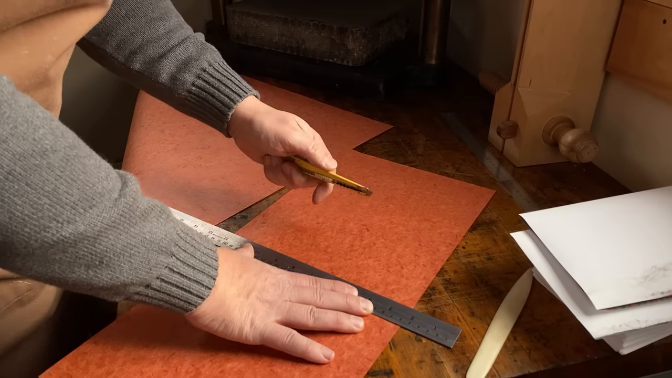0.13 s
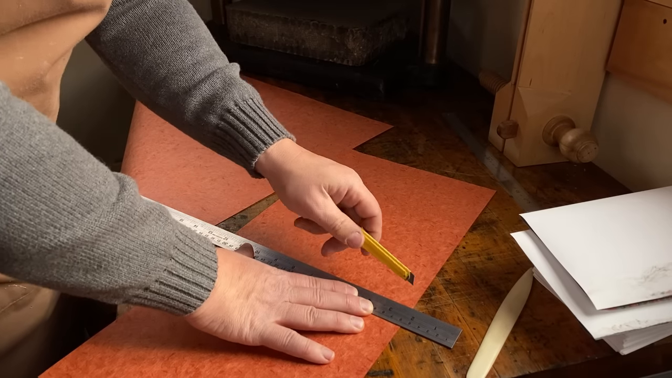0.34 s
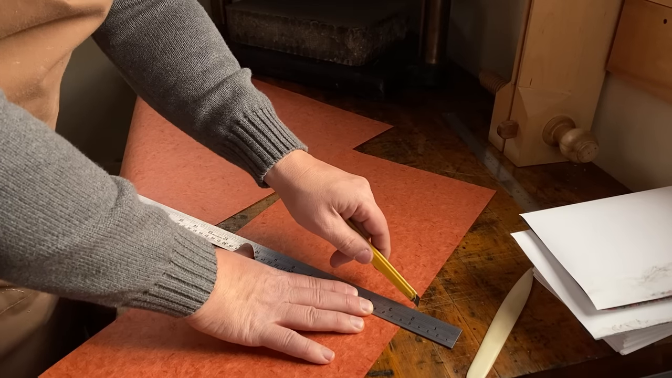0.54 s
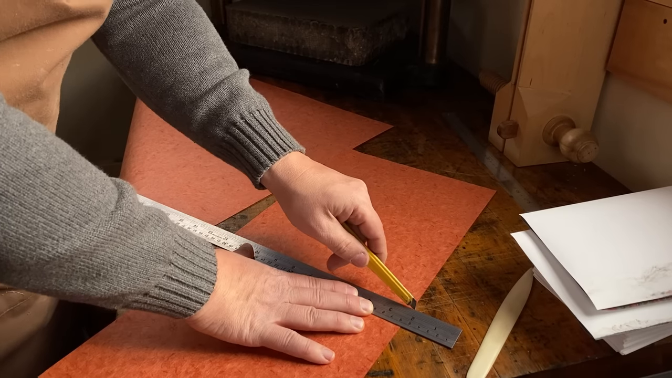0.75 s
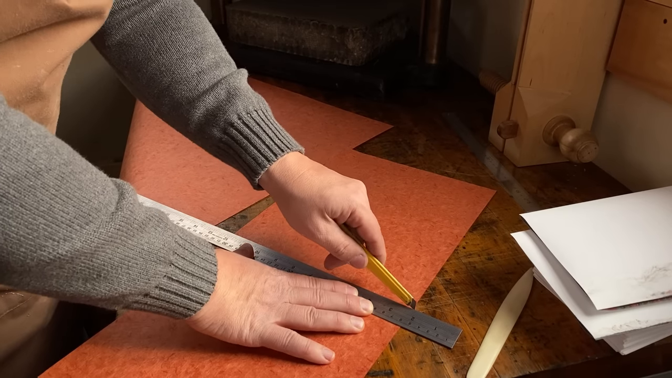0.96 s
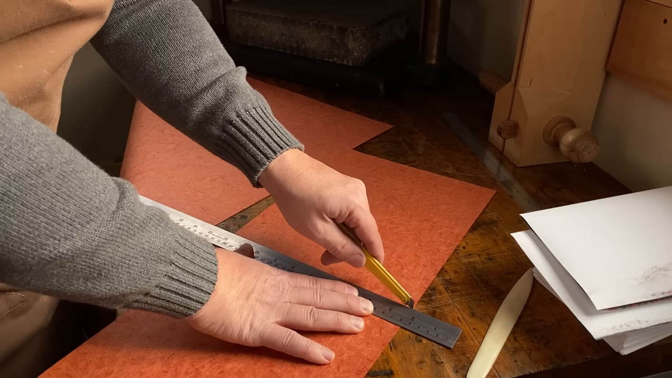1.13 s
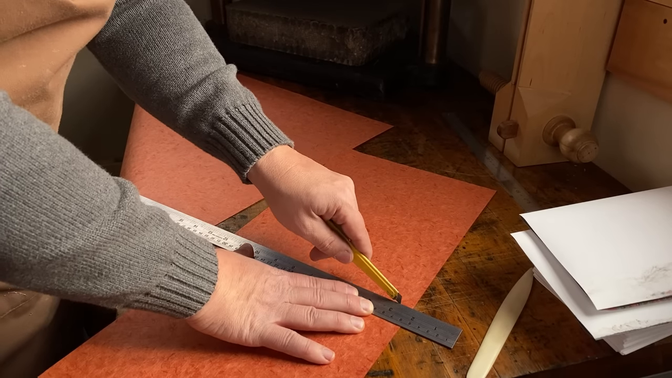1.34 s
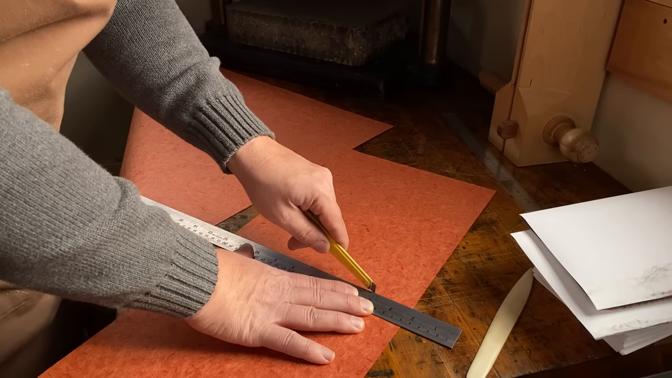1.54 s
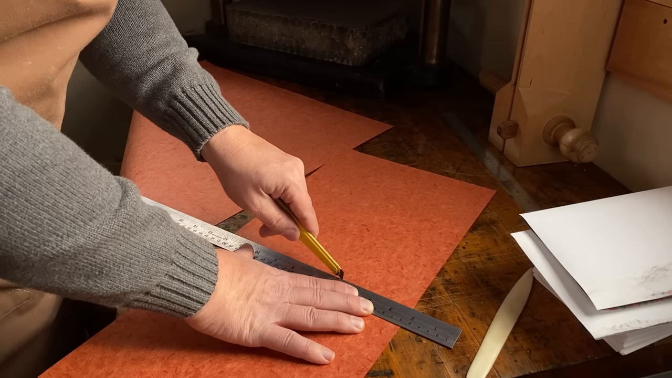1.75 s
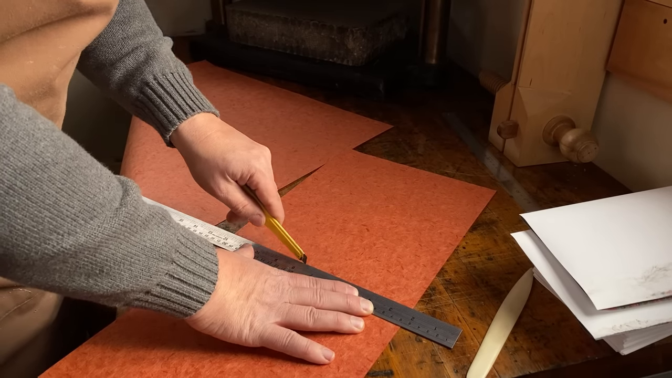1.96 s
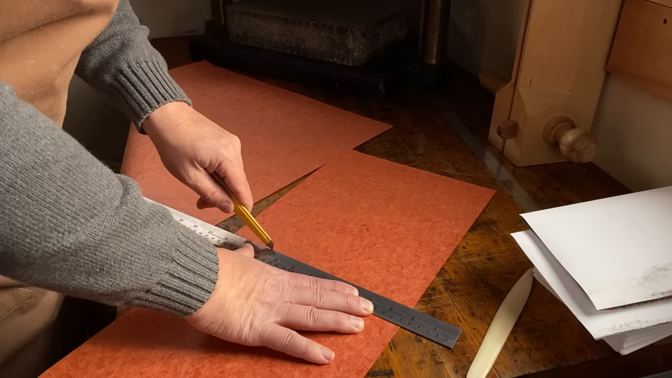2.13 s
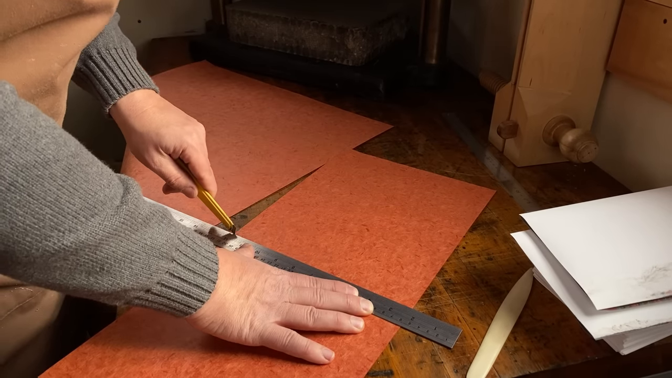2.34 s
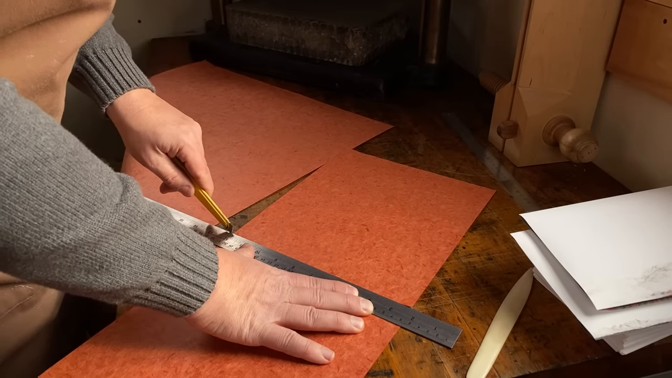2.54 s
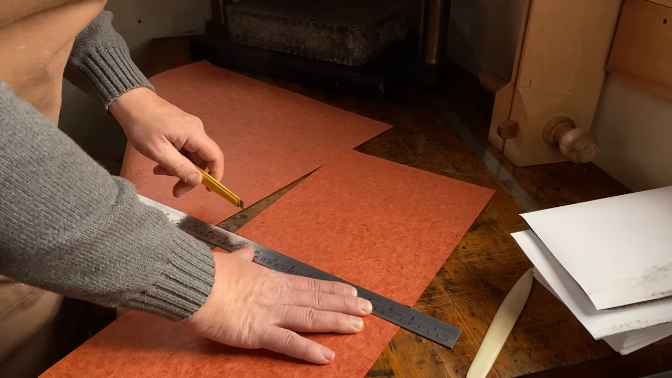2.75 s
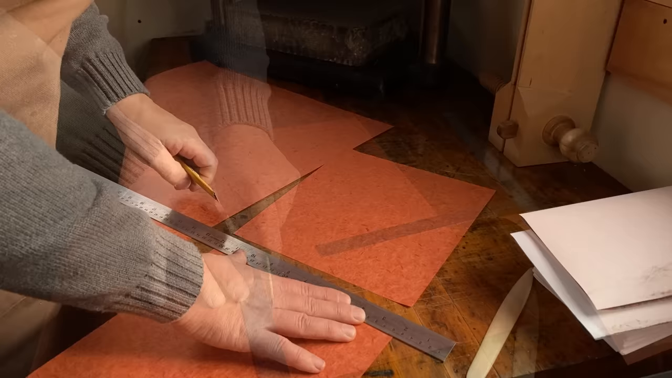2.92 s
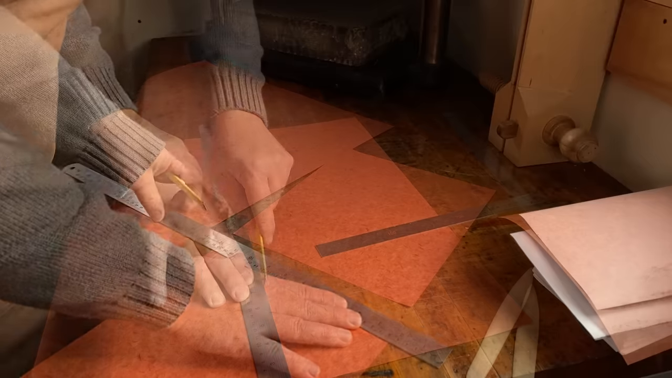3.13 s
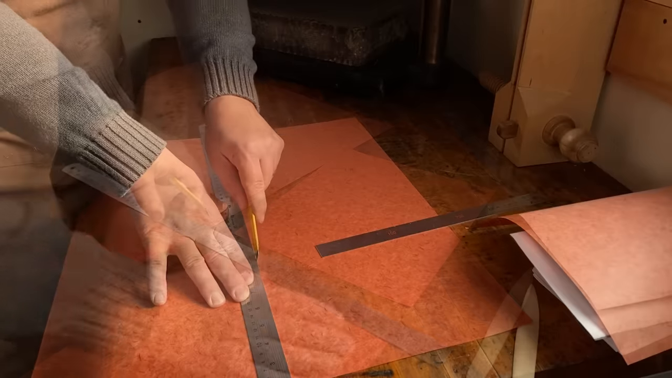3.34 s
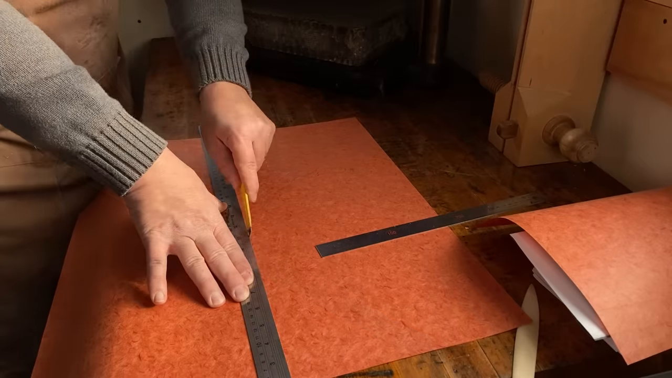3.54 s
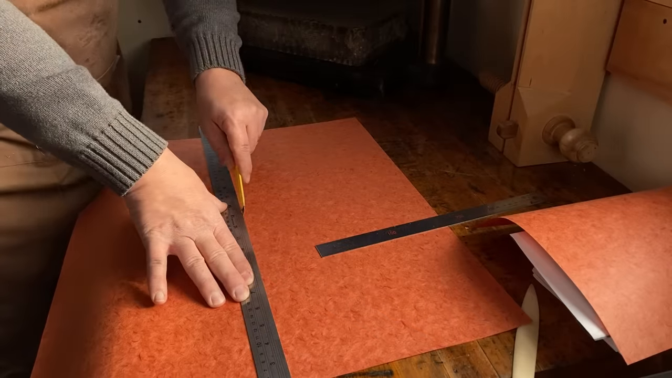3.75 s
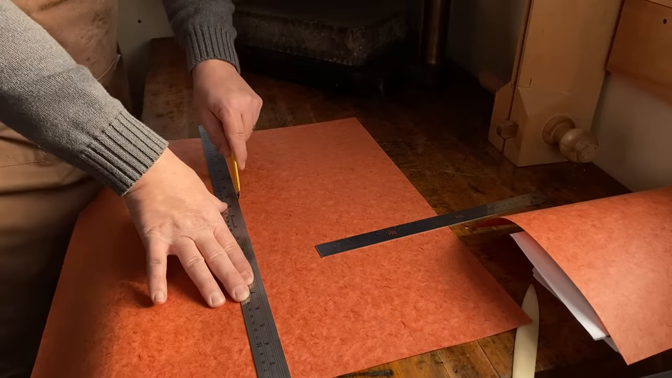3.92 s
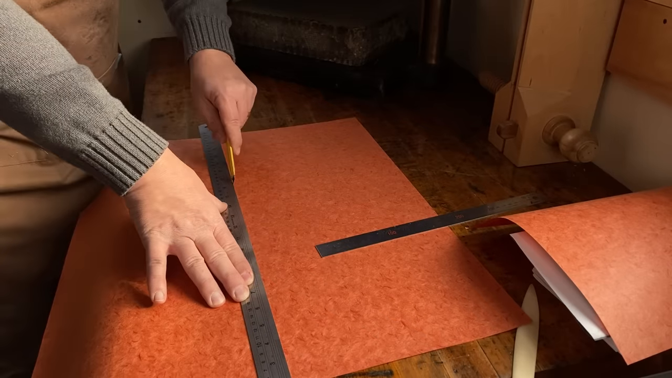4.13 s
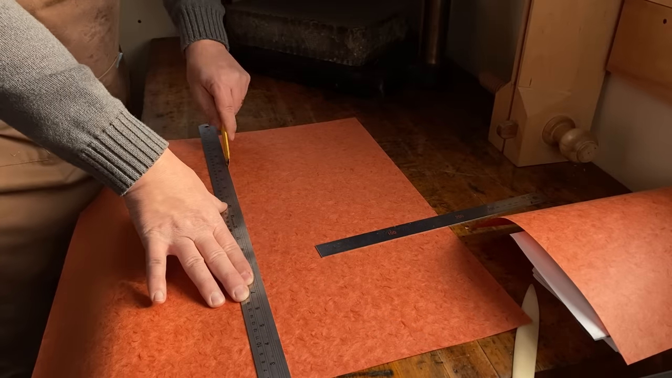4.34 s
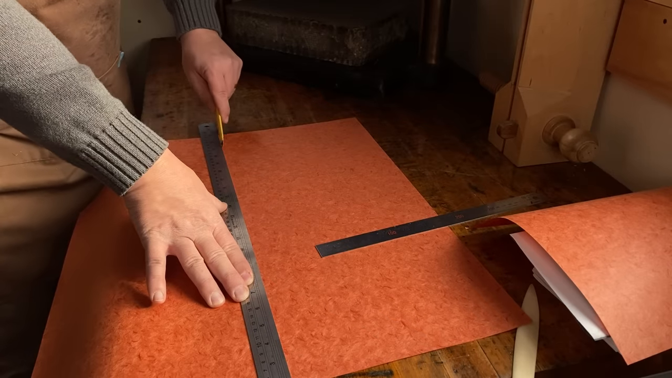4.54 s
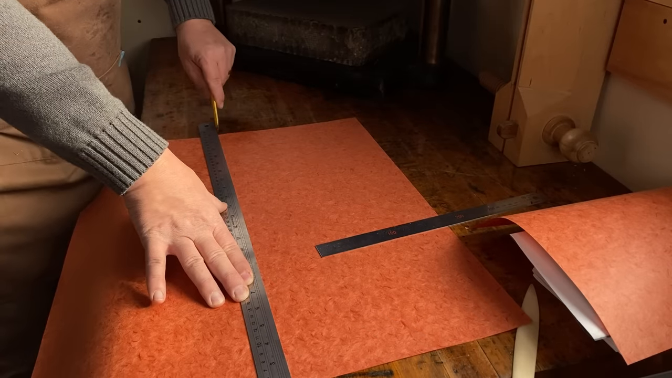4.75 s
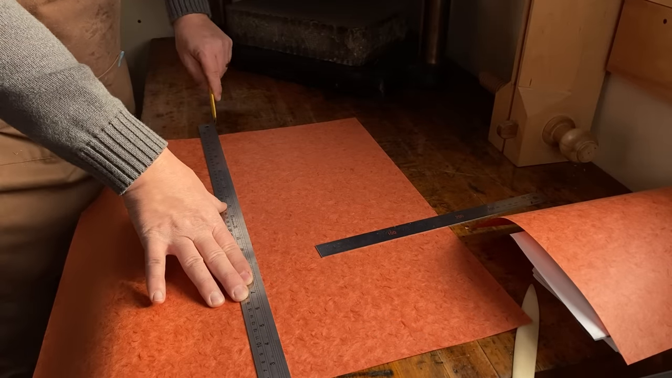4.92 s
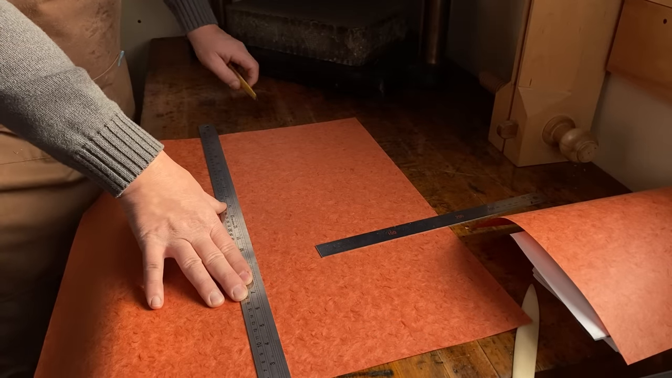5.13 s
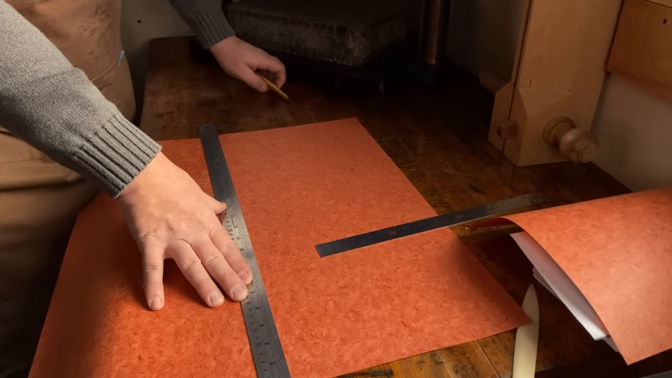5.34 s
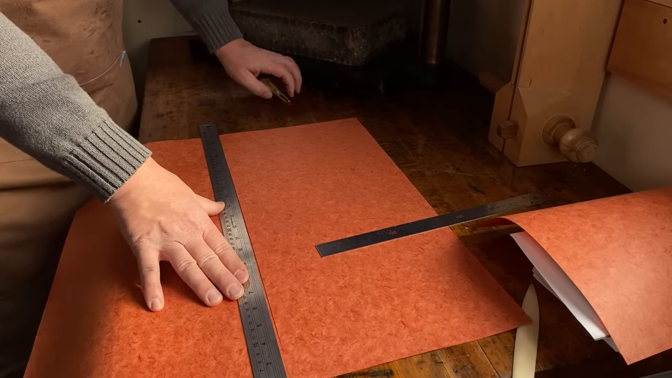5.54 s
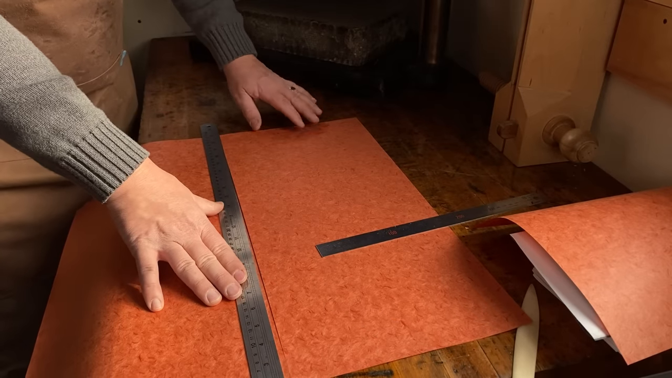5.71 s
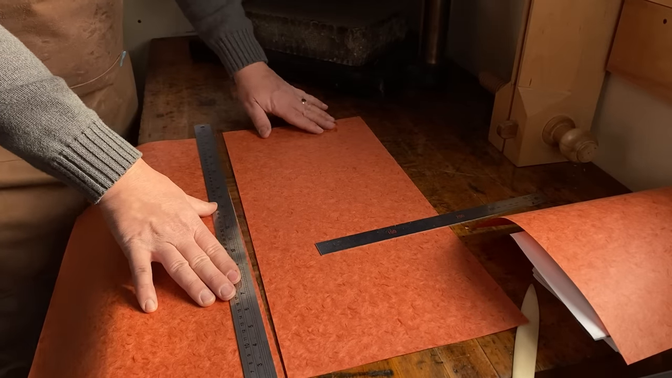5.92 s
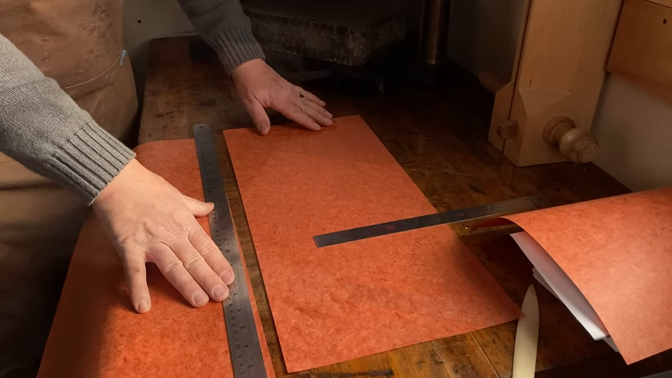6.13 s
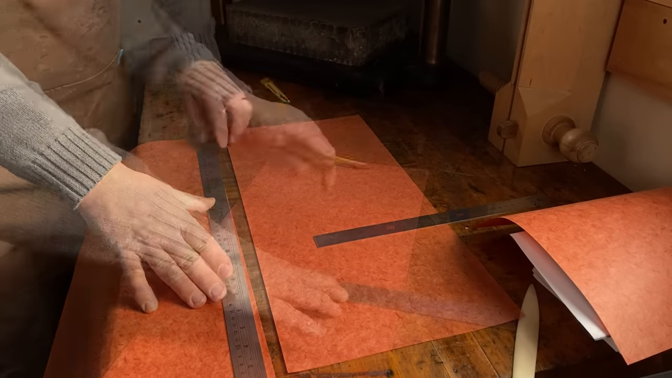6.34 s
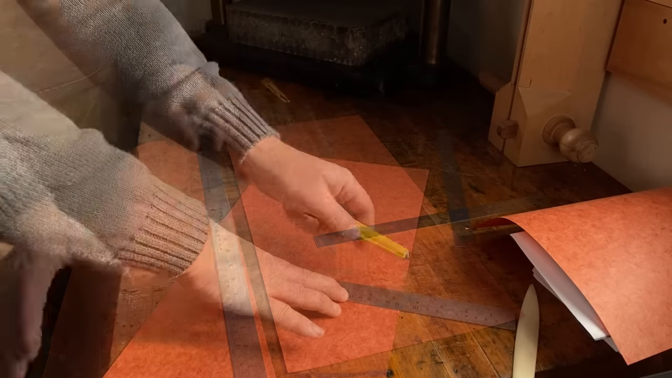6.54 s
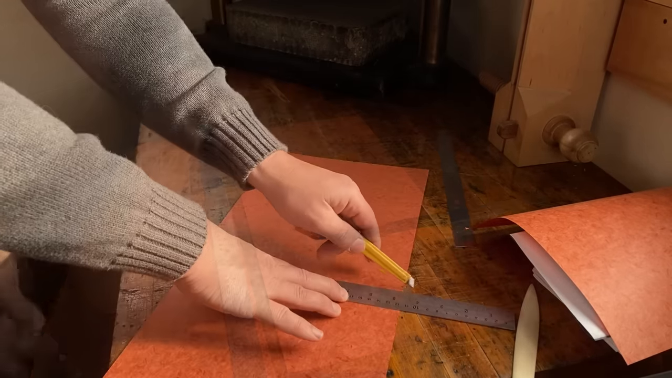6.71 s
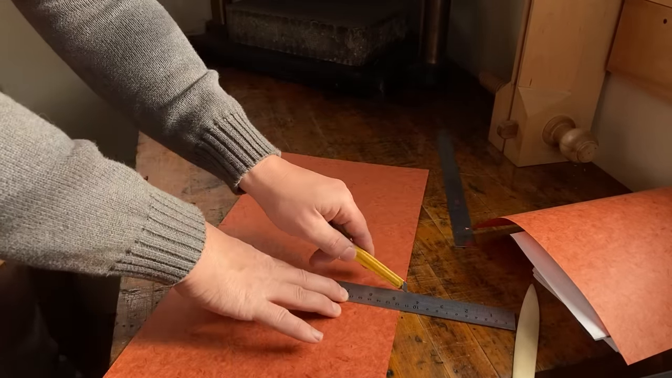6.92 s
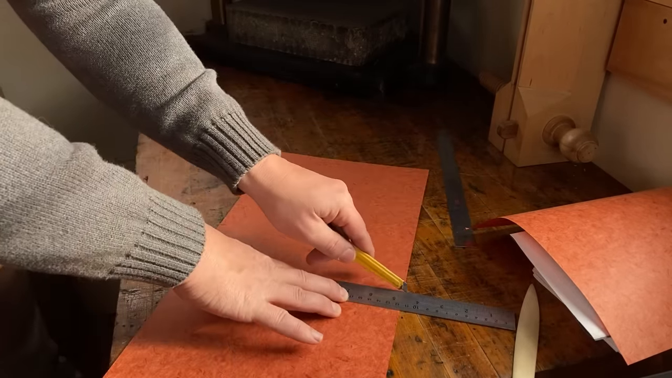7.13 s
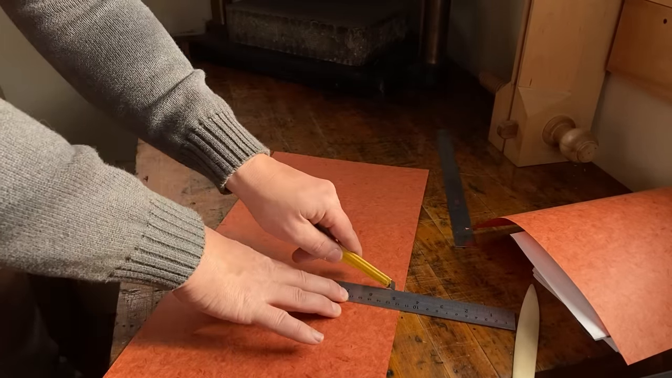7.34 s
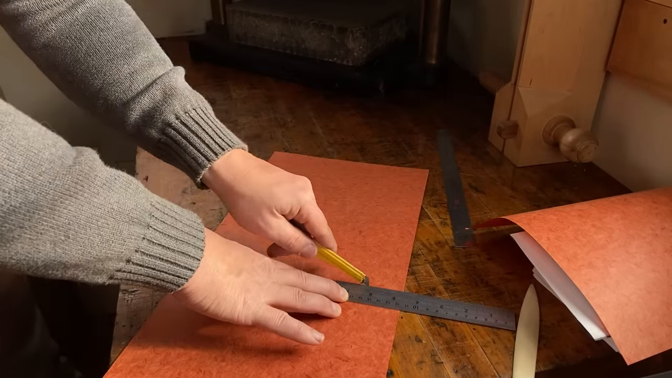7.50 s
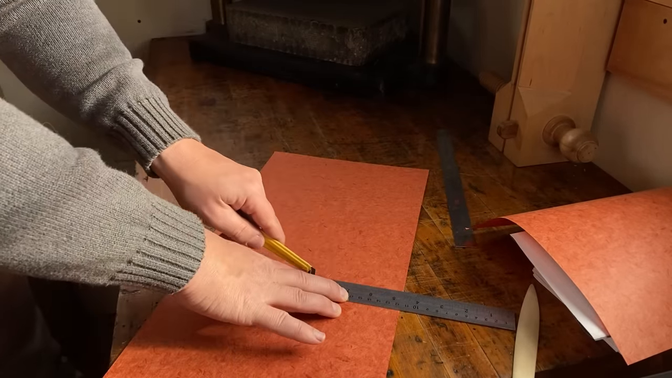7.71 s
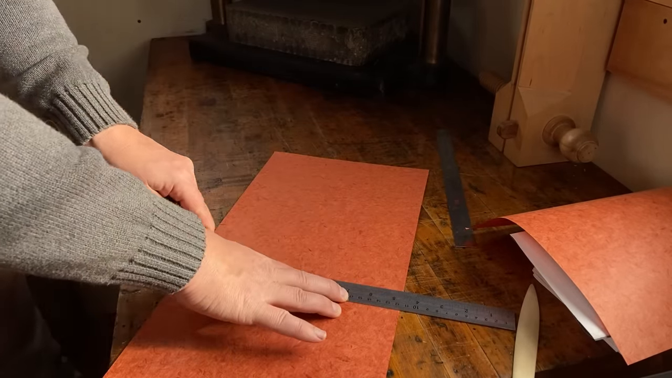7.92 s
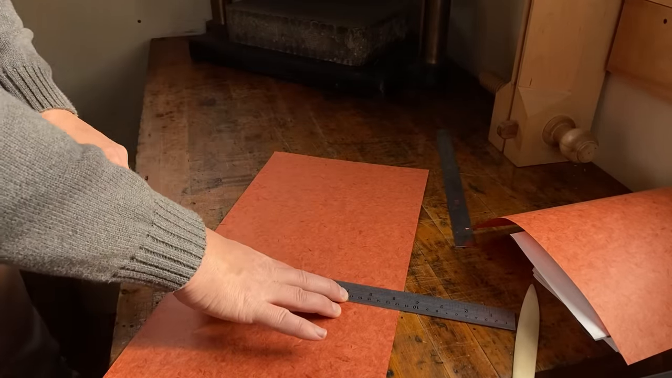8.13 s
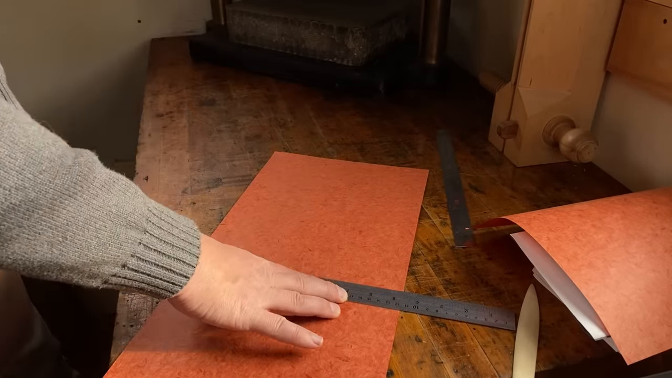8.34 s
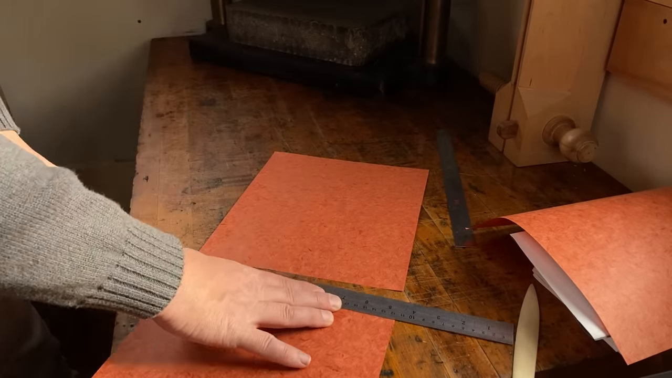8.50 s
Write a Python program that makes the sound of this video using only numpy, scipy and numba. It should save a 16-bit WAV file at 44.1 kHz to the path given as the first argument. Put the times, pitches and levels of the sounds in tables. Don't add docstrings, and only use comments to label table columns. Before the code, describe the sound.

Close, dry microphone at a wooden bench with faint steady hiss. Small plastic and metal ticks lead to a knife rasping through thick paper beside a ruler, growing louder. Light taps and rustling follow, then a longer, harsher cut. A sharp click and the dropped knife's rattling bounces are the loudest moment. Hands brush paper, the slider ticks, and a shorter final scrape gives way to clinks and a soft slide.

```python
import sys
import numpy as np
from scipy import signal
from scipy.fft import rfft, irfft
from scipy.io import wavfile
from numba import njit

SR = 44100
rng = np.random.default_rng(int(sys.argv[2]) if len(sys.argv) > 2 else 0)


def linear_from_db(decibels):
    return 10 ** (np.asarray(decibels, float) / 20)


def digitize_waveform(pressure):
    field = np.atleast_2d(pressure).T
    bounded = np.clip(field, -1, 1)
    quanta = np.round(bounded * 32767).astype(np.int16)
    wavfile.write(sys.argv[1], SR, quanta)


N = 377937

# centre_hz, width_hz, level_db
SHELL_MODES = [(4050, 200, -3.5), (4830, 34, 1.5), (7540, 22, -10), (7700, 80, 0), (9560, 29, -6),
               (9600, 65, -12), (13100, 35, -8.5), (15300, 31, -10)]
# freq_hz, density_db (per Hz)
SCUFF_COLOUR = [(1180, -49), (2000, -8.5), (3320, -15), (3610, 1.5), (5090, 0), (10200, -3), (11200, -19),
                (13300, -13.5), (15500, -30.5)]
# sparkle_db (re peak), t60_s
SCUFF_KIND = (-14.5, 0.18)


def cuts():
    # start_s, effort_db, lean_db (on the bench)
    strokes = [
        [(1.02, -71, 1), (1.134, -55.5, -3), (1.296, -44.5, -6.5), (1.438, -41.5, -4.5), (1.668, -40, -4.5),
         (2.036, -34.5, -2), (2.2, -37, -2.5), (2.3, -36, -7), (2.44, -84.5, 12)],
        [(3.208, -39.5, -7), (3.386, -37.5, -6.5), (3.89, -37, -9.5), (4.054, -34, -10), (4.4, -28, -16)],
        [(4.0, -41, 3), (4.24, -31, -5), (4.474, -24.5, -6.5), (4.655, -26, -7), (4.685, -31.5, -8),
         (4.79, -39, -7.5), (4.856, -46.5, -4.5), (4.97, -68, 6)],
        [(7.13, -61, 1), (7.204, -47, -5.5), (7.406, -38.5, -9), (7.57, -35, -6.5), (7.816, -29.5, -4.5),
         (7.91, -31.5, -9), (7.994, -30.5, -7), (8.14, -38.5, 0.5), (8.2, -52, -18)],
    ]
    # start_hz, width_hz, start_db, end_db
    stroke_modes = [
        [(350, 70, -5, -8), (730, 50, -1, 7), (935, 40, 3, -7), (1460, 70, -3, -14), (1930, 90, -11, -11),
         (2430, 120, -8, -13), (3800, 450, -9, 0), (4400, 300, -7, -8), (5300, 600, -6, -9),
         (6750, 300, -12, -5), (7750, 600, 3, -6), (8550, 400, -6, -4), (9700, 250, -6, -7),
         (12700, 700, -22, -10), (14700, 700, -24, -11)],
        [(415, 50, 2, -1), (720, 70, -5, -4), (940, 80, -3, -3), (1300, 150, -8, -6), (2480, 200, -11, -11),
         (3900, 180, -6, -3), (4400, 160, 1, -2), (5550, 250, -6, -6), (6820, 250, -5, 0), (7700, 350, -1, -6),
         (9550, 550, -1, -1), (12900, 750, -6, -6)],
        [(743, 110, -2, -2), (1310, 160, -4, -4), (3500, 900, -2, -2), (3950, 300, -3, -3), (5140, 200, -4, -4),
         (6700, 200, -3, -6), (8330, 300, -8, 0), (12900, 600, -4, -11)],
        [(230, 25, -45, -14), (410, 80, -8, -12), (555, 40, -12, -4), (700, 50, 8, 3), (920, 70, -18, 1),
         (1130, 90, -5, 1), (1380, 80, -5, -6), (4250, 400, 3, -2), (5500, 330, -7, 3), (7100, 300, -16, -5),
         (7900, 500, -3, -9), (9250, 550, -5, -6), (13500, 900, -20, -12)],
    ]
    # freq_hz, density_db (per Hz)
    stroke_colours = [
        [(35, -79), (60, -67), (335, -13), (559, -12.5), (599, -17), (721, -8.5), (910, -7.5), (2910, -13.5),
         (3930, -17), (8670, -5.5), (15500, -17.5)],
        [(35, -79), (60, -38), (236, -24), (403, -2), (521, -9), (721, -4), (1740, -13), (4220, -14.5),
         (4740, -10), (9300, -11), (15500, -22)],
        [(35, -54), (60, -47), (171, -38), (343, -15.5), (738, -1), (2050, -6.5), (3500, 1.5), (5710, -7.5),
         (8280, -10.5), (11200, -18.5), (15500, -17)],
        [(35, -86), (60, -71.5), (150, -38), (240, -29), (403, -8), (599, -7.5), (688, -22), (792, -10),
         (2200, -12), (5320, -12), (6120, -13), (9300, -11), (15500, -20)],
    ]
    # fade_in_s, fade_out_s
    stroke_fades = [(0, 0), (0, .4), (.4, 0), (0, 0)]
    snap_rates = [346, 471, 800, 442]
    snap_spreads_db = [1.4, 1.4, 2.2, 1.9]
    steel_levels_db = [-1.5, -3, -6.5, -4]
    sags = [0, .1, .03, .055]
    # low_hz, high_hz
    sag_band_hz = (3400, 5800)
    cut_edges_hz = (90, 1800, 6000, 19000)
    steel_db_per_lean_db = -0.28

    out = np.zeros(N)
    for i, stroke in enumerate(strokes):
        n, (effort_db, lean_db) = span(stroke)
        size = len(n) + SR // 4
        force = scrape(size, snap_rates[i], snap_spreads_db[i])
        on_paper, on_steel = force * rng.standard_normal((2, size))
        ring = signal.fftconvolve(on_paper, body(stroke_colours[i], valley_db=1.5))[:size]
        for k, (from_hz, width_hz, from_db, to_db) in enumerate(stroke_modes[i]):
            sagging = sag_band_hz[0] < from_hz < sag_band_hz[1]
            to_hz = from_hz * (1 - sags[i] * sagging)
            centre_hz = np.linspace(from_hz, to_hz, size) * (1 + .007 * walk(6, size))
            level_db = np.linspace(from_db, to_db, size) + 2.6 * walk(9, size)
            mode = resonance(on_steel, centre_hz, 1.2 * width_hz)
            mode = resonance(mode, centre_hz, 2.8 * width_hz)
            ring += (-1) ** k * linear_from_db(level_db) * mode
        sheet, tear, steel = layers(room(ring)[SR // 4:], cut_edges_hz)
        sheet = sheet * linear_from_db(lean_db + walk(25.9, len(n)))
        steel_db = steel_levels_db[i] + steel_db_per_lean_db * lean_db
        steel = steel * linear_from_db(steel_db + 0.28 * walk(24.2, len(n)))
        in_s, out_s = stroke_fades[i]
        t = np.arange(len(n)) / SR + 1 / SR
        left = t[::-1]
        fade = np.sqrt(t / np.maximum(t, in_s) * left / np.maximum(left, out_s))
        out[n] += fade * linear_from_db(effort_db) * (tear + sheet + steel)
    return out


def scrape(size, rate_per_s, spread_db):
    sizes = linear_from_db(np.minimum(spread_db * rng.exponential(size=size), 14))
    snaps = (rng.random(size) < rate_per_s / SR) * sizes
    decay_s = .0006
    snaps = signal.lfilter([1], [1, -np.exp(-1 / (decay_s * SR))], snaps)
    flutter = linear_from_db(.7 * walk(40, size))
    return flutter * (unit(snaps) + 2.6)


@njit
def resonance(x, hz, width):
    y, b, l = np.empty(len(x)), 0., 0.
    for i in range(len(x)):
        g, k = np.tan(np.pi * hz[i] / SR), width / hz[i]
        v = (b + g * (x[i] - l)) / (1 + g * (g + k))
        b, l, y[i] = 2 * v - b, l + 2 * g * v, k * v
    return y


def room(x):
    t60_s, wash_db = 0.22, -5
    t = np.arange(SR // 3) / SR
    wash = rng.standard_normal(len(t)) * linear_from_db(-60 * t / t60_s) * (t > .002)
    response = linear_from_db(wash_db) * wash / np.sqrt(np.sum(wash ** 2))
    response[0] = 1
    return signal.fftconvolve(x, response)[:len(x)]


def bounces():
    # start_s, peak_db, bench_db (re peak)
    landings = [(5.4105, 2.5, -20), (5.4192, -0.5, -47), (5.4234, 1, -21.5), (5.4293, -9, -13),
                (5.45, -24, -28), (5.474, 2, -18), (5.491, -15.5, -11), (5.5223, -3.5, -22),
                (5.5381, -14.5, -12.5), (5.563, -21.5, -10), (5.5691, -17, -17), (5.58, -25.5, -10.5),
                (5.597, -25.5, -10), (5.6173, -27.5, -11.5), (5.637, -38, -4)]
    # centre_hz, width_hz, level_db
    knife_modes = [(4750, 60, -8), (4980, 120, -2), (5190, 60, -8), (6120, 90, -14), (6990, 110, -12),
                   (7380, 140, -9), (7710, 110, -9), (7910, 150, -10), (8890, 200, -12), (9700, 250, -10),
                   (12200, 120, -16), (13700, 160, -11), (14500, 400, -16)]
    # freq_hz, density_db (per Hz)
    knife_colour = [(1180, -63), (2000, -12), (2140, -26.5), (2870, -20.5), (3340, -21), (4920, -3.5),
                    (5890, -14), (7680, -8), (10800, -15.5), (14100, -22), (15500, -18.5)]
    bounce_kind = (-13, 0.22)
    out = np.zeros(N)
    for s, db, bench_db in landings:
        shift = [40, 0, 3] * rng.standard_normal((len(knife_modes), 3))  # Hz, Hz, dB
        knife = body(knife_colour, np.array(knife_modes) + shift, valley_db=-3.5)
        add_hit(out, s, db + 0.5, bench_db, bounce_kind, knife, rise_s=.002, crack_s=.0017, tail_db=-12)
    return out


def thud():
    # start_s, push_s, peak_db
    push = (5.414, .022, -54)
    start_s, length_s, db = push
    share = np.clip((np.arange(N) / SR - start_s) / length_s, 0, 1)
    return linear_from_db(db) * np.sin(np.pi * share) ** 2


def catches():
    # start_s, peak_db, ring_hz
    snags = [(1.149, -34, 7850), (1.8943, -18.5, 8850), (2.008, -20, 8800), (2.115, -15.5, 3950),
             (2.285, -23, 8450), (2.3238, -24, 8400), (4.6652, -12, 2950), (4.7084, -18.5, 8100),
             (4.7436, -19.5, 8000), (4.798, -20, 4200), (4.8714, -22, 8760), (7.179, -39, 7740),
             (8.1189, -21.5, 4330)]
    catch_kind = (-19.5, 0.17)
    bench_db = -12
    return shell_hits([(*row, bench_db) for row in snags], catch_kind)


def ticks():
    # start_s, peak_db, ring_hz, bench_db (re peak)
    handling = [(0.02, -29, 6920, -31), (0.1196, -29, 4560, -38), (0.1775, -38, 7800, -10),
                (0.2169, -39, 3720, -16), (0.2608, -36.5, 7700, -26), (0.5482, -31.5, 7500, -35),
                (0.5994, -44, 4110, -24.5), (1.037, -48, 7820, -23), (1.07, -42.5, 3880, -7),
                (1.1204, -37.5, 8090, -17), (2.8324, -27, 3700, -22), (3.024, -40.5, 3010, -2),
                (5.0524, -39, 5750, -12), (6.8664, -25, 4570, -19), (6.7082, -18, 3870, -24.5),
                (8.2786, -18.5, 8200, -26), (8.3235, -25, 4370, -26), (8.5654, -38, 3140, -32)]
    # start_s, peak_db, ring_hz, bench_db (re peak)
    slider_play = [
        (0.673, -30, 4050, -30),
        (5.2343, -22.5, 7470, -40),
    ]
    tick_kind = (-16.5, .19)
    return shell_hits([*handling, *slider_play], tick_kind)


def clinks():
    # start_s, peak_db, ring_hz, bench_db (re peak)
    contacts = [(0.0014, -28.5, 7700, -23), (0.0672, -30.5, 8000, -32), (2.816, -23.5, 6640, -21),
                (3.678, -13.5, 8800, -18), (8.1495, -19, 7700, -23), (8.4048, -13.5, 7700, -42)]
    clink_kind = (-6.5, 0.099)
    return shell_hits(contacts, clink_kind)


def pricks():
    # start_s, peak_db, ring_hz, bench_db (re peak)
    touches = [(2.5596, -37, 8640, -25), (2.575, -34, 7810, -11), (2.602, -30, 3650, -20),
               (2.629, -32, 4000, -18), (2.6405, -26, 8400, -27), (2.744, -47, 8600, -19),
               (2.7641, -41, 8800, -19), (2.9821, -32, 9440, -33), (7.1477, -29.5, 8550, -11.5),
               (8.2531, -25.5, 7800, -37), (8.4052, -25, 2980, -40), (8.4334, -20, 7800, -29),
               (8.5245, -23, 9700, -16.5)]
    prick_kind = (-19, 0.098)
    return shell_hits(touches, prick_kind)


def shell_hits(table, kind):
    # freq_hz, density_db (per Hz)
    tick_colour = [(1180, -42.5), (2000, -10), (2990, -12), (4040, -4), (4670, -9.5), (5090, -7),
                   (5540, -6), (7290, -7), (10300, -7), (11200, -12.5), (15500, -4)]
    out = np.zeros(N)
    for s, db, hz, bench_db in table:
        response = body(tick_colour, [*SHELL_MODES, (hz, 0.13 * hz, 3.5)], valley_db=-0.5)
        add_hit(out, s, db - 1.5, bench_db, kind, response, rise_s=.0005, crack_s=.002, tail_db=-7)
    return out


def scuffs():
    # start_s, peak_db, ring_hz, bench_db (re peak)
    notches = [(0.685, -14.5, 4920, -23.5), (2.637, -29.5, 8350, -30), (4.905, -30, 4300, -31),
               (5.009, -42.5, 4950, -7), (5.243, -8.5, 7360, -25.5), (5.589, -19, 7700, -16.5),
               (6.8503, -27.5, 4420, -16.5), (8.008, -26, 4200, -16), (8.033, -16, 6900, -13)]
    out = np.zeros(N)
    for s, db, hz, bench_db in notches:
        response = body(SCUFF_COLOUR, [*SHELL_MODES, (hz, 0.12 * hz, 2.5)], valley_db=-2.5)
        add_hit(out, s, db + 1.4, bench_db, SCUFF_KIND, response, rise_s=.008, crack_s=.005, tail_db=-4)
    return out


def drags():
    # start_s, peak_db, ring_hz, bench_db (re peak)
    rubs = [(2.5, -44, 8300, -20), (2.518, -42, 7950, -14), (2.534, -41, 8400, -10),
            (2.803, -41, 7200, -14), (5.352, -31.5, 7600, -11.5), (5.372, -38, 4950, -14.5),
            (5.385, -38.5, 6700, -14), (5.399, -34, 8100, -14)]
    out = np.zeros(N)
    for s, db, hz, bench_db in rubs:
        response = body(SCUFF_COLOUR, [(hz, .04 * hz, 6)], valley_db=-6)
        add_hit(out, s, db, bench_db, SCUFF_KIND, response, rise_s=.014, crack_s=.011, tail_db=-5.5)
    return out


def add_hit(out, s, peak_db, bench_db, kind, response, rise_s, crack_s, tail_db):
    # centre_hz, width_hz, level_db
    bench_modes = [(430, 50, 3), (554, 50, 4), (980, 50, 3), (1400, 80, 3), (1750, 50, 6), (2500, 200, -2)]
    # freq_hz, density_db (per Hz)
    bench_colour = [(35, -62), (60, -30), (129, -44), (200, -5.5), (422, 2), (788, -7), (965, 2.5),
                    (2500, -2), (3250, -36.5), (5500, -120)]
    sparkle_db, t60_s = kind
    t = np.arange(SR // 5) / SR
    after = np.maximum(t - rise_s, 0)
    tail = linear_from_db(tail_db - 60 * after / np.clip(t60_s, .02, .4))
    envelope = np.minimum(t / rise_s, 1) ** 2 * (np.exp(-after / crack_s) + tail)
    force = rng.standard_normal(len(t)) * envelope
    full = signal.fftconvolve(force, response)[:len(t)]
    ring = band(full, 2000, 11000)
    sparkle = band(full, 11000, 19500)
    bench = body(bench_colour, bench_modes, valley_db=-4.5)
    knock = signal.fftconvolve(force, bench)[:len(t)]
    hit = ring / abs(ring).max()
    hit += linear_from_db(sparkle_db + 8.5) * sparkle / abs(sparkle).max()
    hit += linear_from_db(bench_db) * knock / abs(knock).max()
    start = max(int((s - .6 * rise_s) * SR), 0)
    out[start:start + len(t)] += linear_from_db(peak_db) * hit[:N - start]


def slides():
    # start_s, rub_db, hiss_db (re rub)
    moves = [
        [(0.0, -69, 27), (0.122, -60, -1), (0.248, -57.5, -1), (0.348, -62.5, -4), (0.826, -82, -3),
         (1.05, -76, 3)],
        [(2.42, -81, 5), (2.566, -55.5, -7), (2.71, -64, 2), (2.78, -57.5, -2), (2.83, -50.5, 4.5),
         (2.94, -53, 1), (2.975, -65, 3), (3.208, -62, -2)],
        [(4.95, -62, 1), (5.3, -61, -8), (5.41, -58, 18)],
        [(5.62, -64, 0), (5.776, -42.5, -1), (5.84, -42, -2), (5.89, -42.5, 3.5), (5.94, -43, -2.5),
         (5.992, -44.5, -3.5), (6.086, -65.5, -7.5), (6.308, -57.5, -1), (6.48, -59, -0.5), (6.7, -76.5, 7)],
        [(6.7, -63.5, 8), (6.864, -65, 0.5), (7.15, -69.5, 1)],
        [(8.2, -54, 0), (8.248, -55.5, -2), (8.37, -58.5, 1), (8.48, -48.5, 3.5), (8.57, -46, 1.5)],
    ]
    # rest_level_db, slope_db_per_db (of rub)
    slide_bench = [(-70, 0.084), (-61, 0.8), (-60.5, .1), (-61, 0.5), (-59.5, 1.6), (-69.5, 1.45)]
    # freq_hz, density_db (per Hz)
    slide_colour = [(35, -64.5), (60, -31.5), (192, -37), (226, -12), (394, -5.5), (572, -3), (738, 2.5),
                    (1070, 0), (1450, -2.5), (6560, -4.5), (9000, -4), (10800, -13), (15500, -12)]
    slide_edges_hz = (90, 1200, 4000, 19000)
    rest_db = -58
    out = np.zeros(N)
    rub = signal.fftconvolve(rng.standard_normal(N), body(slide_colour, [(716, 44, 4)]))[:N]
    parts = np.array([linear_from_db(0.47 * walk(25, N)) * part for part in layers(rub, slide_edges_hz)])
    for table, (bench_db, slope) in zip(moves, slide_bench):
        n, (rub_db, hiss_db) = span(table)
        levels_db = [bench_db + slope * (rub_db - rest_db), rub_db, rub_db + hiss_db]
        out[n] += np.sum(linear_from_db(levels_db) * parts[:, n], axis=0)
    return out


def rumble():
    # start_s, level_db
    rumble_levels = [(0, -118), (3.15, -118), (3.25, -90), (4.6, -85), (4.75, -88), (5.2, -89), (5.3, -93.5),
                     (6.4, -89.5), (6.6, -116), (8.57, -116)]
    n, (db,) = span(rumble_levels)
    out = np.zeros(N)
    out[n] = linear_from_db(db) * unit(band(rng.standard_normal(len(n)), 35, 99))
    return out


def room_tone():
    # freq_hz, density_db (per Hz)
    air_colour = [(18, -83), (30, -54), (86, -20), (170, -14), (265, -11), (403, -7.5), (797, -4.5),
                  (2400, -8), (2960, -11), (3460, -12.5), (15900, -19.5)]
    air = signal.fftconvolve(rng.standard_normal(N), body(air_colour))[:N]
    return linear_from_db(-62.5) * unit(air)


def unit(x):
    return x / np.sqrt(np.mean(x ** 2))


def body(colour, modes=(), valley_db=0):
    taps = 2048
    hz = np.maximum(np.arange(taps // 2 + 1) * SR / taps, 1)
    points = np.array(colour, float)
    colour_db = np.interp(np.log(hz), np.log(points[:, 0]), points[:, 1])
    power = linear_from_db(colour_db + valley_db) ** 2
    for centre_hz, width_hz, db in modes:
        offset = 2 * (hz - centre_hz) / max(width_hz, 50)
        power = power + linear_from_db(db) ** 2 / (1 + offset ** 2) ** 2
    cepstrum = irfft(np.log(power) / 2)
    cepstrum[1:taps // 2] *= 2
    cepstrum[taps // 2 + 1:] = 0
    return irfft(np.exp(rfft(cepstrum)))


def band(x, lo_hz, hi_hz):
    sos = signal.butter(3, [lo_hz, min(hi_hz, .45 * SR)], "band", fs=SR, output="sos")
    return signal.sosfilt(sos, x)


def layers(x, edges_hz):
    return [unit(band(x, lo, hi)) for lo, hi in zip(edges_hz, edges_hz[1:])]


def walk(rate_hz, size):
    steps = np.repeat(rng.standard_normal(int(size * rate_hz / SR) + 3), 4)
    levels = np.convolve(steps, np.ones(4) / 4)
    place = np.arange(size) * 4 * rate_hz / SR + 4
    return 1.2 * np.interp(place, np.arange(len(levels)), levels)


def span(table):
    s, *columns = np.transpose(table)
    n = np.arange(int(s[0] * SR), min(int(s[-1] * SR), N))
    return n, [np.interp(n / SR, s, c) for c in columns]


def scene():
    knife = cuts() + catches() + bounces() + thud()
    handling = ticks() + clinks() + pricks() + scuffs() + drags() + slides()
    return (knife + handling + rumble() + room_tone())[None]


def top_cut(x):
    return signal.sosfilt(signal.butter(12, 16020, fs=SR, output="sos"), x)


def record(dry):
    low_pass = signal.ellip(8, .2, 60, 15650, fs=SR, output="sos")
    mix = np.clip(signal.sosfilt(low_pass, dry), -1, 1)
    return top_cut(mix)


dry = scene()
out = record(dry)
digitize_waveform(out)
```